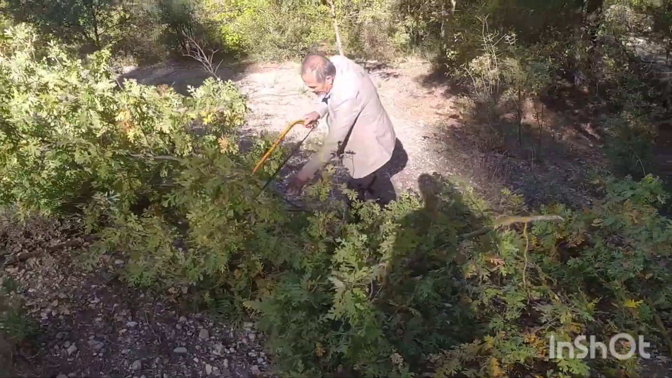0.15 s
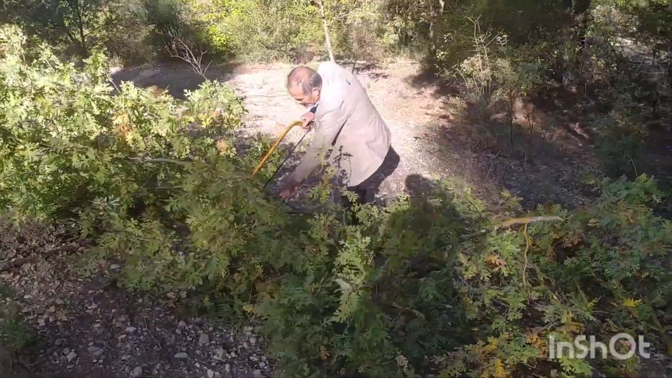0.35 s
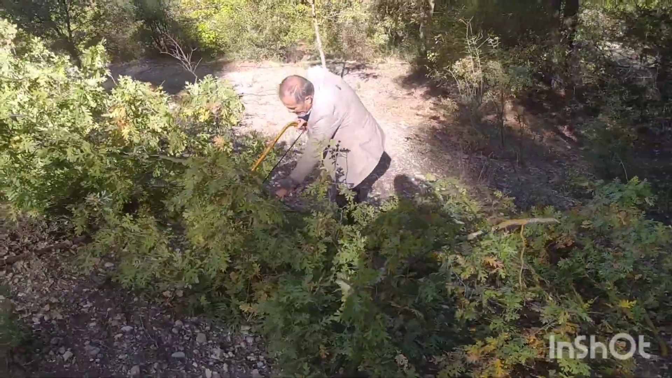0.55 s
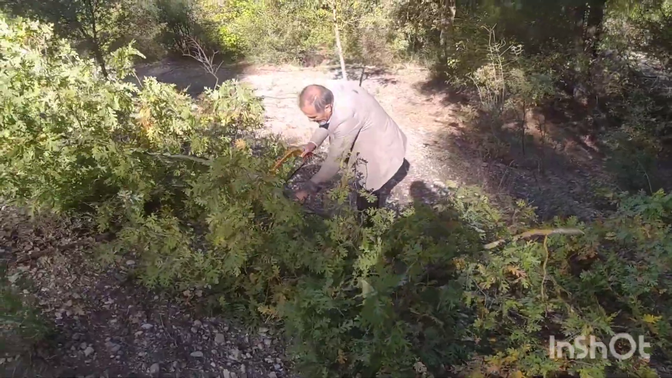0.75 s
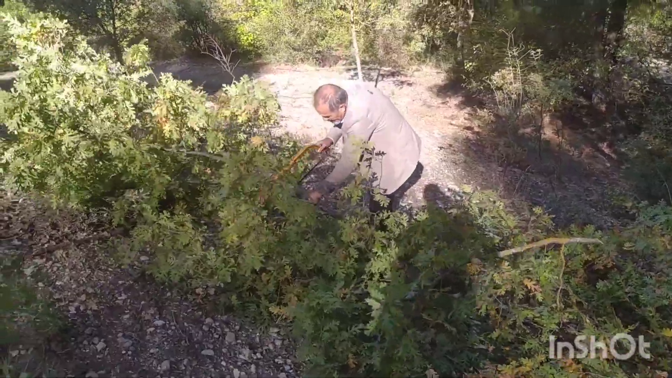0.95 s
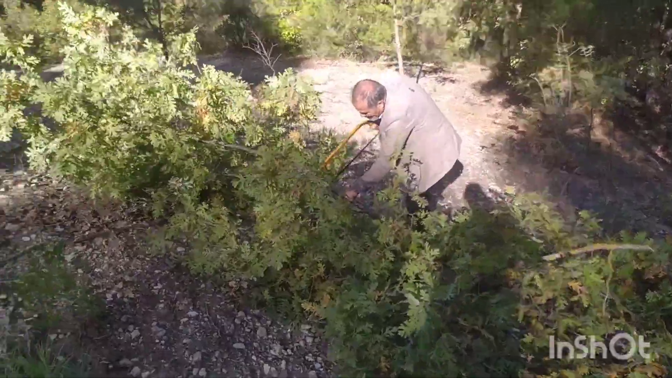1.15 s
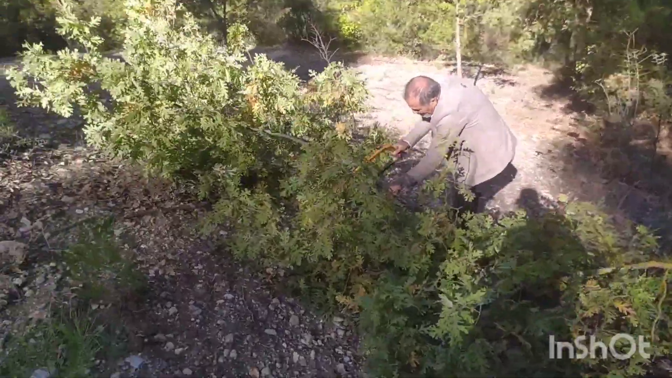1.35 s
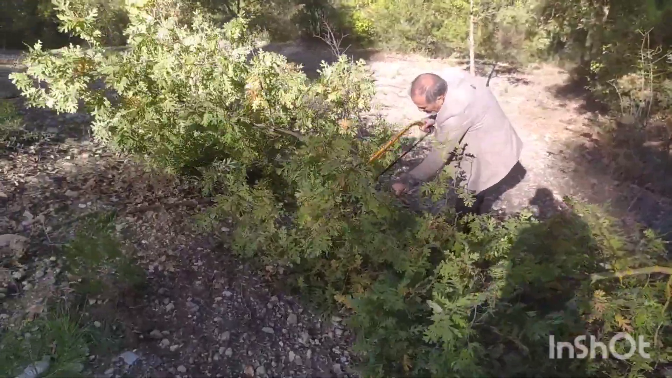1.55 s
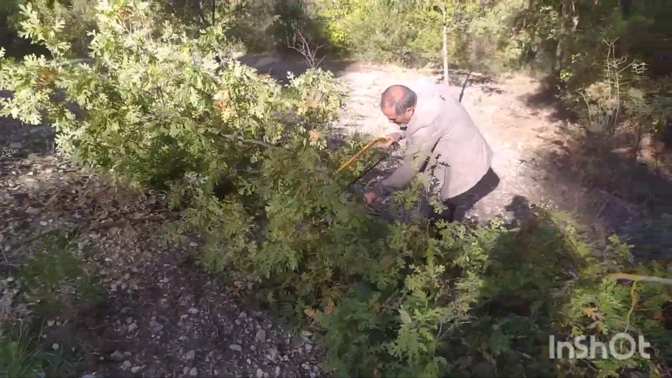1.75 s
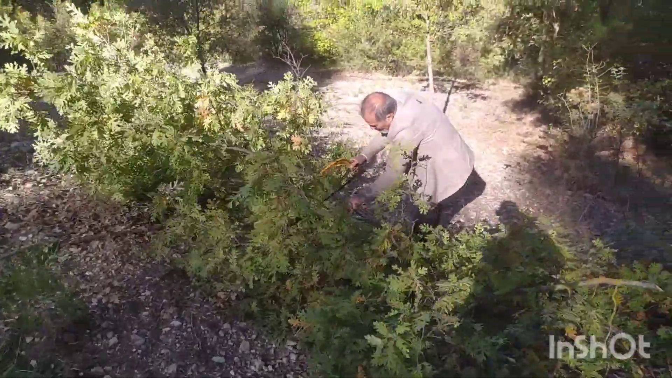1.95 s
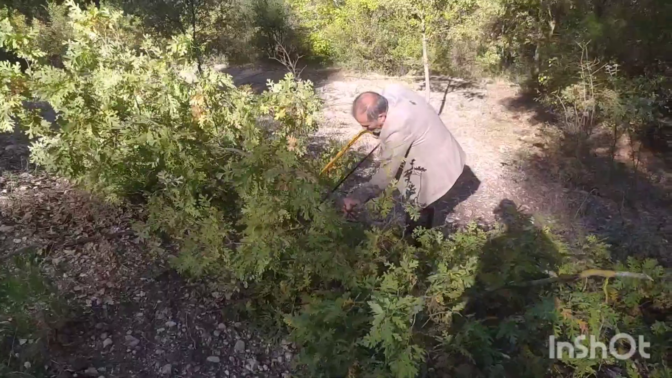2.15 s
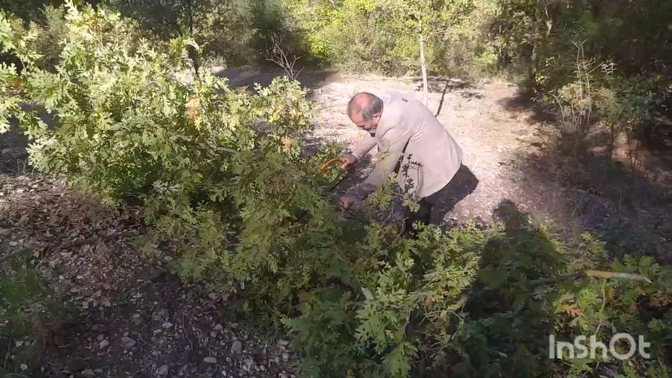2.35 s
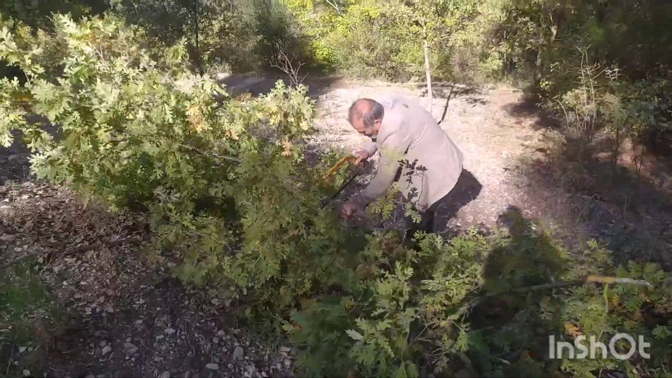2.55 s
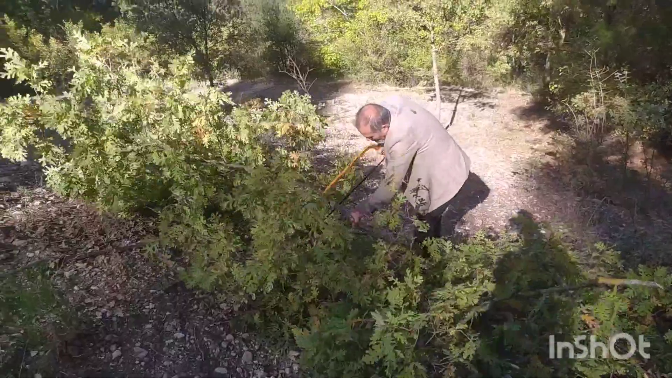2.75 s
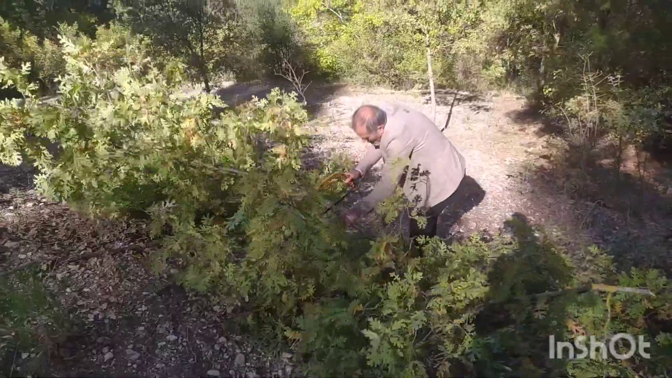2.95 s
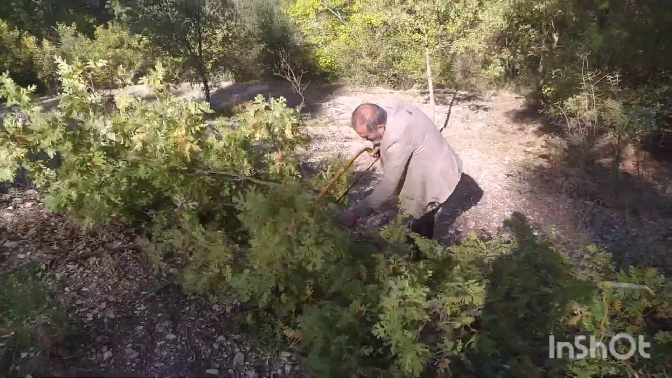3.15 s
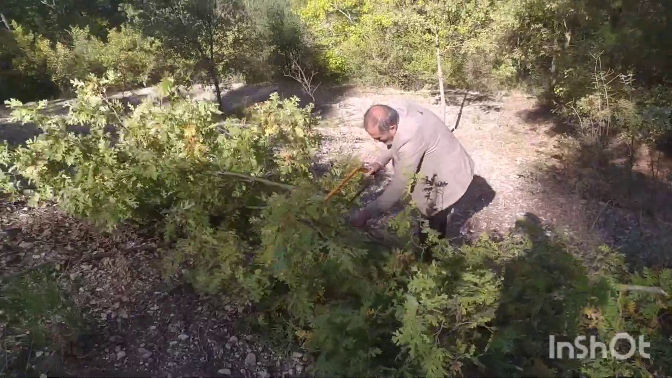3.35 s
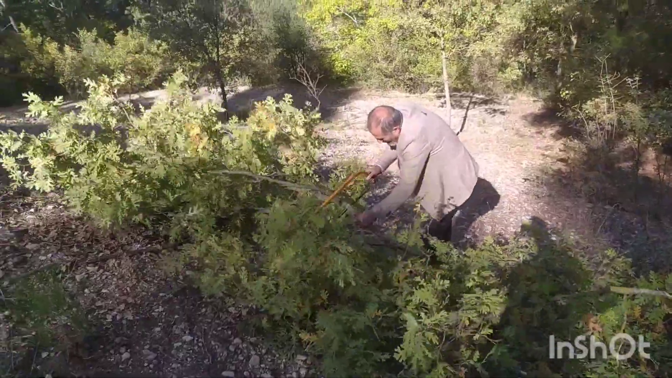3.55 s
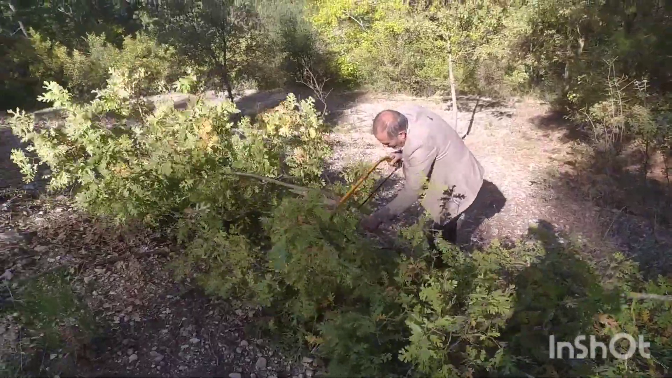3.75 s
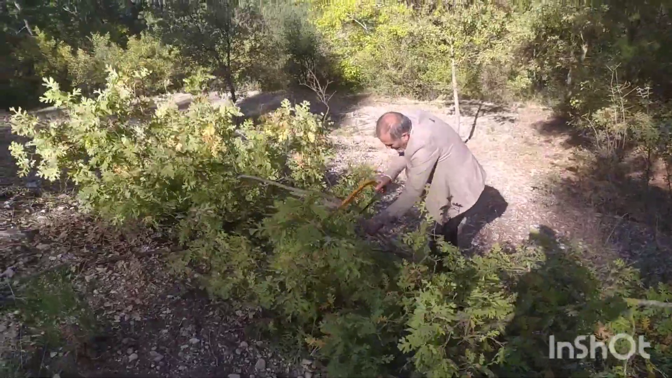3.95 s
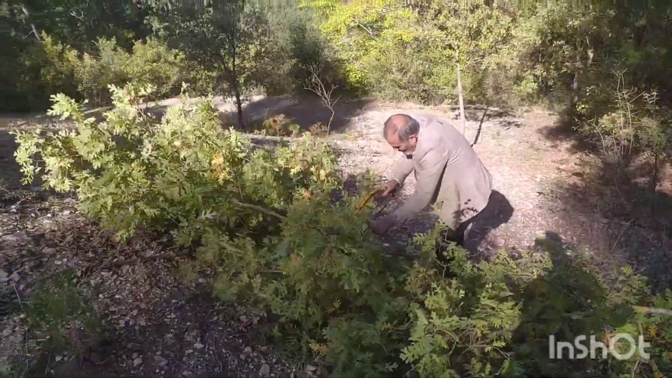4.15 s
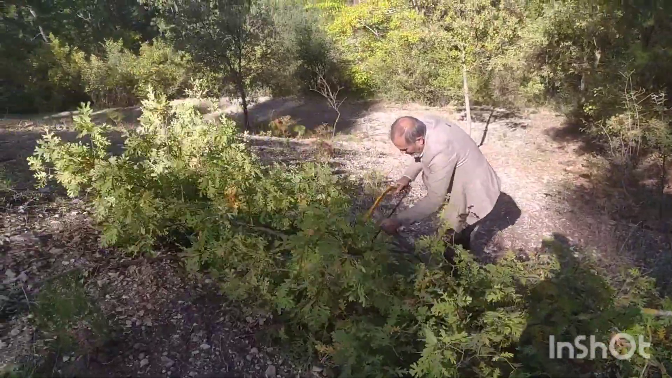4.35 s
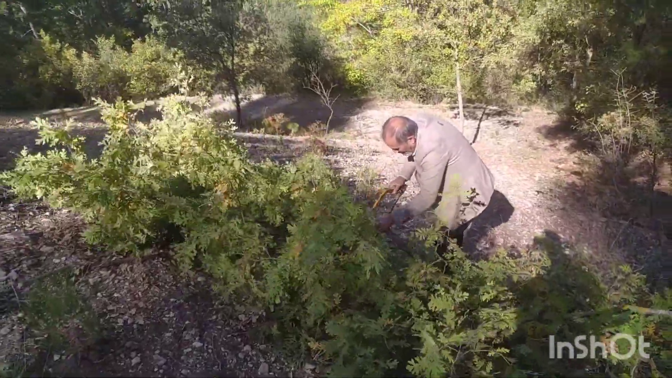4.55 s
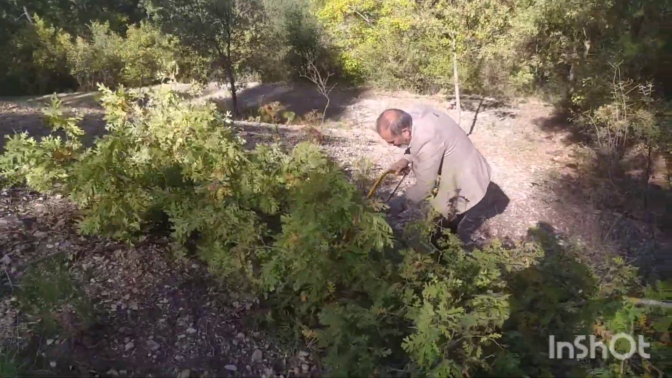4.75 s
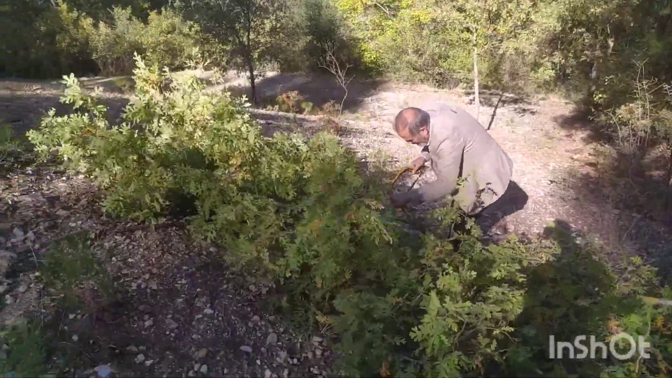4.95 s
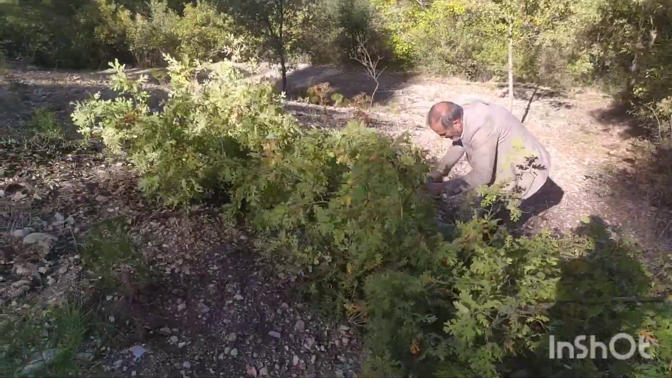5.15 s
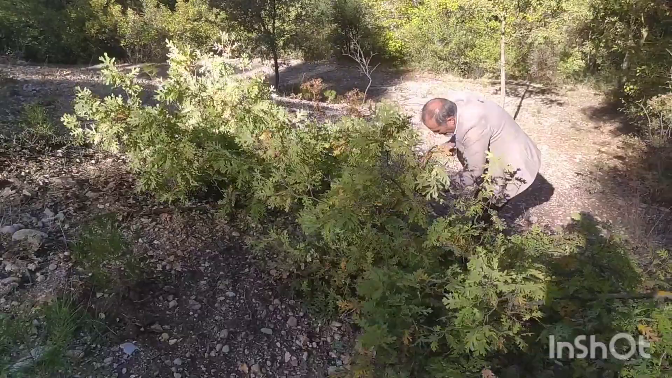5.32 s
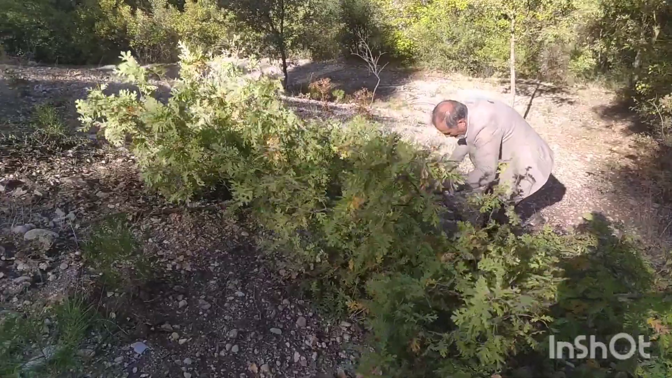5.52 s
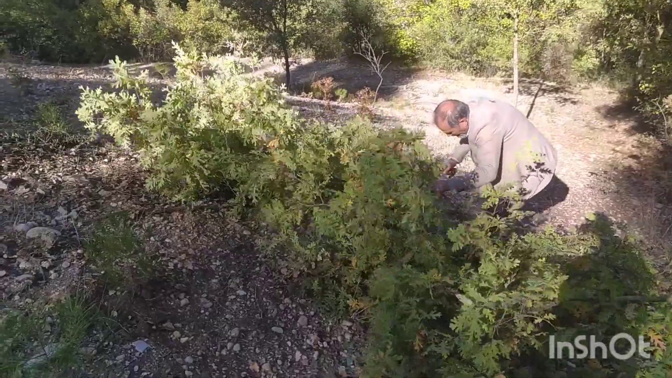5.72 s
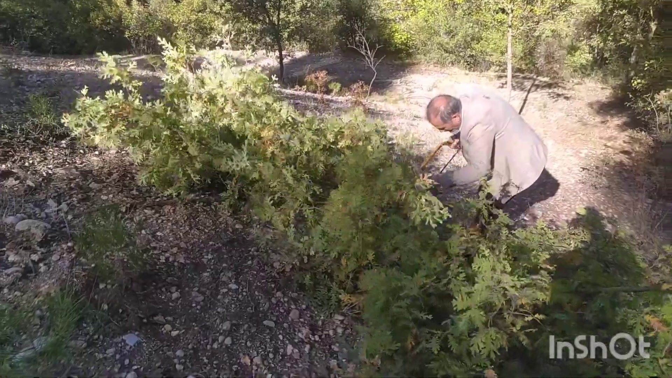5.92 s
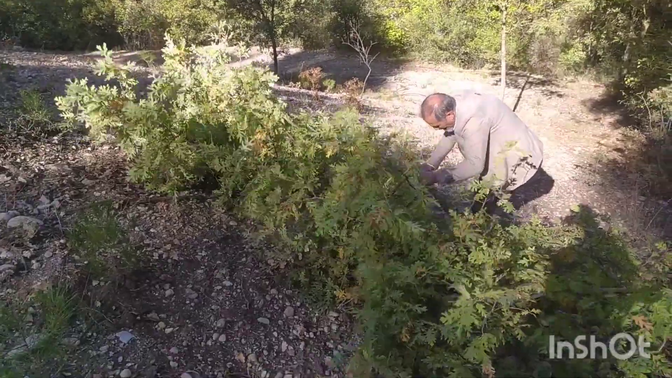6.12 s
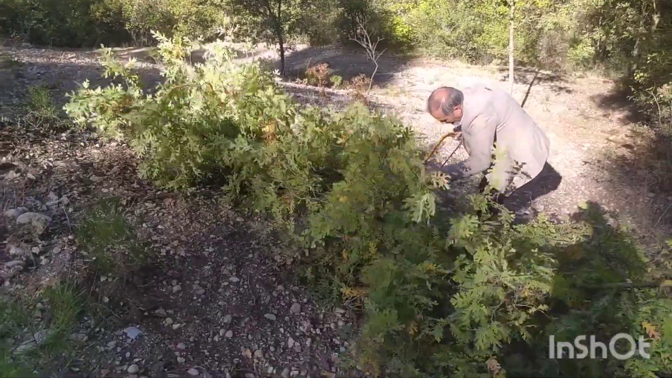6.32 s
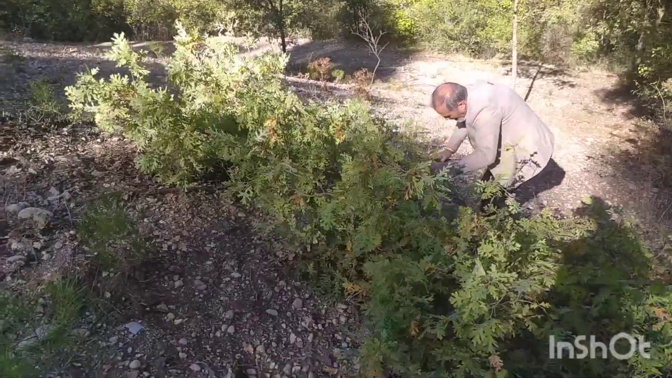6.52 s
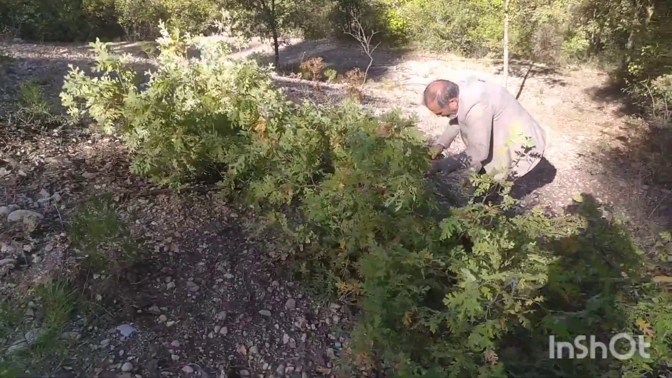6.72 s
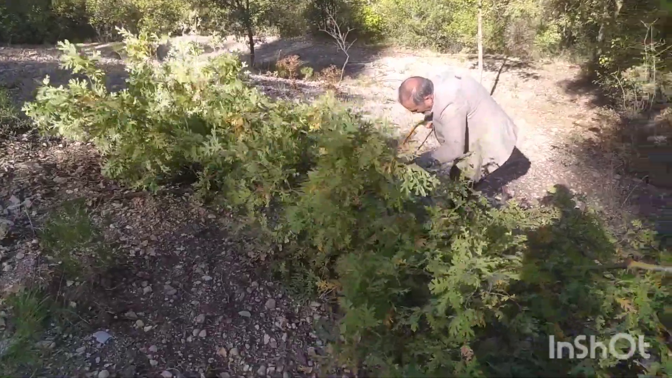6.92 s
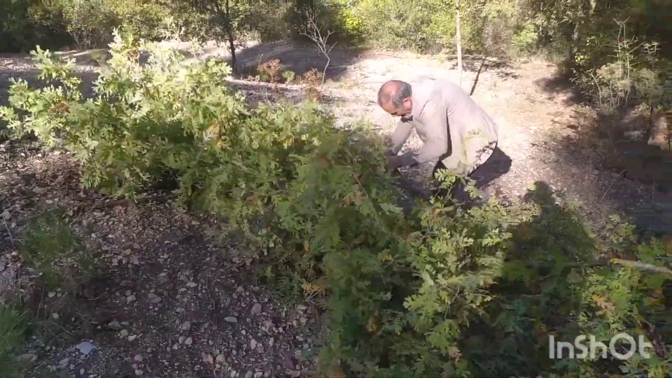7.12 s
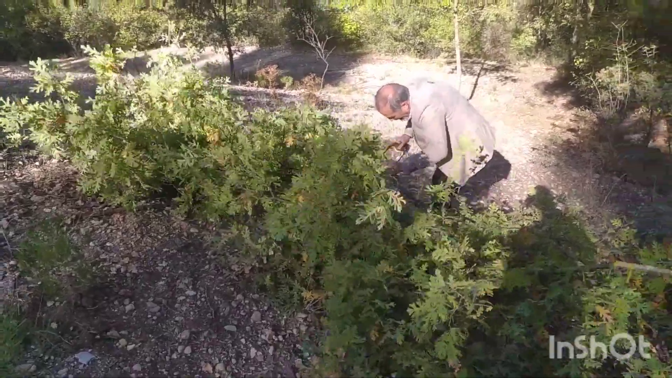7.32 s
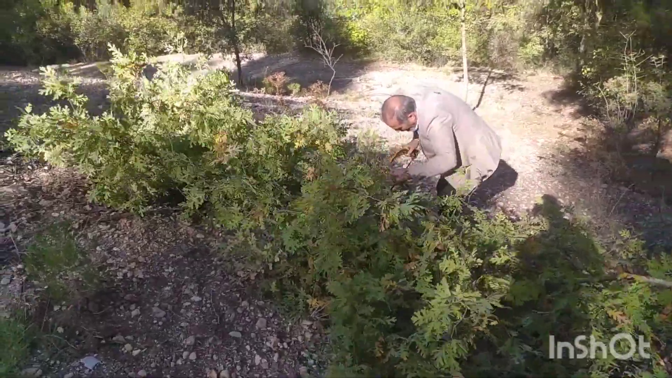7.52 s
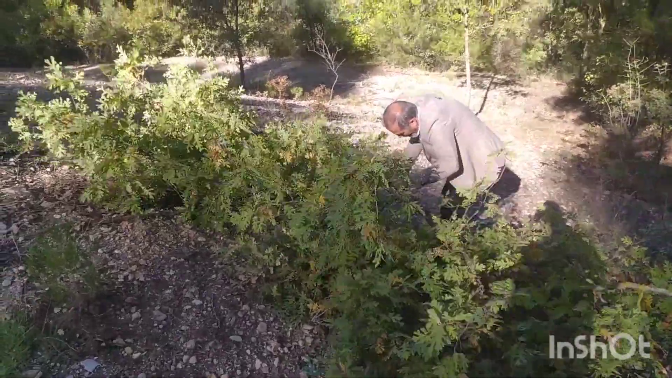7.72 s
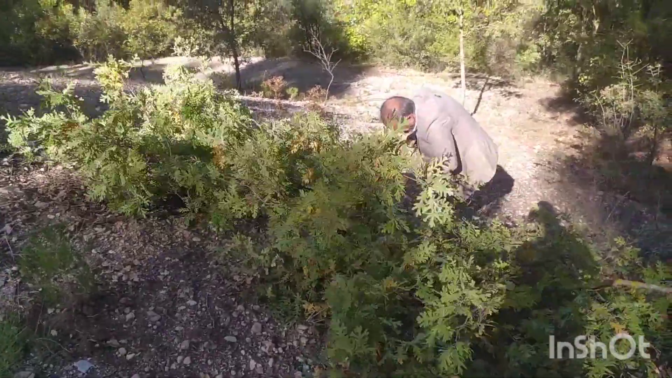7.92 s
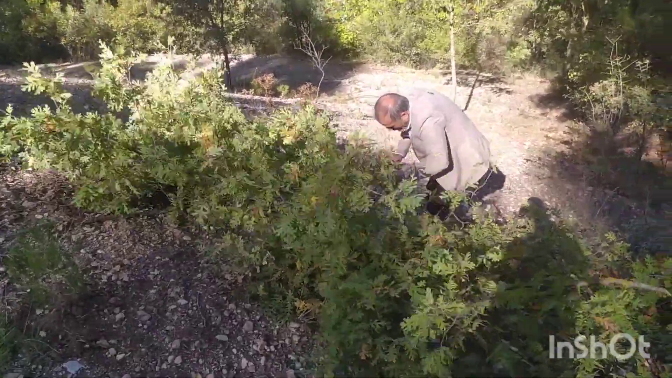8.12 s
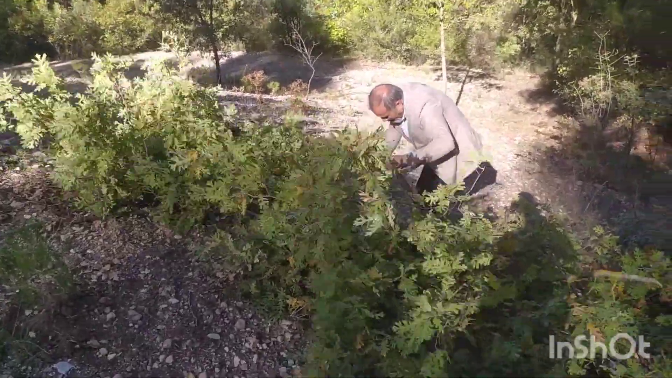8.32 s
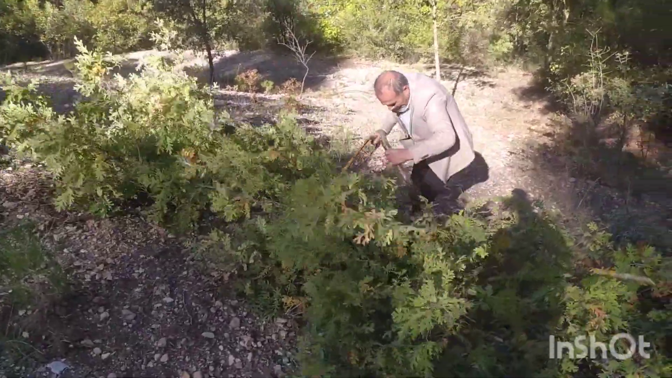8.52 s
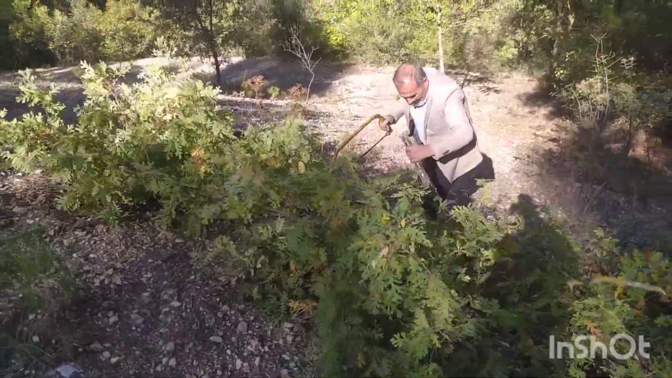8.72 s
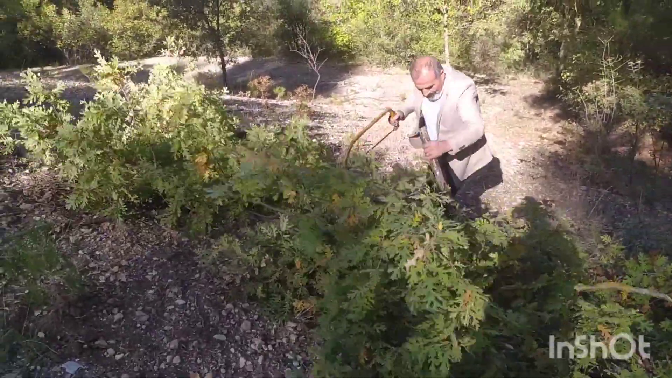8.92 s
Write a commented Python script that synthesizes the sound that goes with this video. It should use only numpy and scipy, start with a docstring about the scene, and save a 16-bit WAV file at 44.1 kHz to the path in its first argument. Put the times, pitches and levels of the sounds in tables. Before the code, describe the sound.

Outdoors at a woodland edge, dry leaves stir and small twigs tick before a bow saw starts rasping through a branch in quick, alternating hard and light strokes. It halts briefly midway as foliage rustles and twigs crack, then resumes with deeper, more ringing strokes. A loud snap and leaf rustle end the cut. A far engine and road hum sit faintly behind. Stereo microphone a few metres away, almost no echo.

```python
"""A bow saw rasps through a leafy branch in a wood, about four strokes a second, with a short rest half way.
The teeth tear wood, ring the blade, hiss as steel slides in the cut, and make the branch judder.
Shaken leaves rustle, twigs snap, and an engine labours far away over road noise and air.
Shaped noise makes the rasp, blade, leaves, snaps and background; the engine is a stack of sine overtones."""
import sys
import numpy as np
from scipy import signal
from scipy.fft import rfft, irfft, next_fast_len
from scipy.io import wavfile
from scipy.ndimage import uniform_filter1d, map_coordinates

SR = 44100
rng = np.random.default_rng(int(sys.argv[2]) if len(sys.argv) > 2 else 0)


def master_out(mix):
    """Clip the mix to full scale and print it as 16-bit PCM to the path in sys.argv[1]."""
    frames = np.transpose(np.atleast_2d(mix))
    ceiling = np.clip(frames, -1, 1)
    pcm = np.round(ceiling * 32767).astype(np.int16)
    wavfile.write(sys.argv[1], SR, pcm)


N = 400365

# Hard cutting strokes. Each row: start in seconds, length in seconds, rasp level in dB before the mix,
# change at the bite in dB.
CUTS = [(0.598, 0.32, -39.5, -0.1), (1.177, 0.27, -38.5, 7), (1.718, 0.26, -36.5, 7.2),
        (2.233, 0.26, -36.5, 5.5), (2.755, 0.26, -36.5, 8), (3.282, 0.24, -36, 0.5), (3.841, 0.23, -36, -2),
        (4.93, 0.291, -42, 6), (5.467, 0.24, -37.5, 2.5), (5.956, 0.263, -39, 9.5), (6.437, 0.29, -39, 11),
        (6.961, 0.28, -37, 10.5), (7.477, 0.28, -40.5, 9), (8.08, 0.15, -41, 5)]
# Lighter return strokes, the last a short scrape as the blade comes free.
# Each row: start in seconds, length in seconds, rasp level in dB before the mix.
RETURNS = [(0.922, 0.268, -39), (1.463, 0.25, -39), (1.984, 0.24, -36), (2.505, 0.24, -38.6),
           (2.993, 0.29, -40), (3.61, 0.23, -42.5), (4.674, 0.26, -52.5), (5.183, 0.301, -39),
           (5.698, 0.261, -38.5), (6.192, 0.265, -38.5), (6.712, 0.26, -37.7), (7.256, 0.23, -37),
           (7.711, 0.36, -44), (8.383, 0.072, -43.5)]
# Teeth tearing wood. Each row: frequency in Hz, relative density in dB per Hz.
RASP_SPECTRUM = [(250, -50), (420, -5.5), (650, -20.5), (820, -3.5), (1080, -9.5), (1350, -1), (2300, 2.5),
                 (2850, 1), (3150, -5), (3750, 2.5), (4500, -10.5), (5600, -6), (7500, -21)]
# Steel sliding in the cut. Each row: frequency in Hz, relative density in dB per Hz.
HISS_SPECTRUM = [(3500, -32), (5000, -9.5), (5800, -11.5), (6650, -1), (7200, -6.5), (8200, -0.5),
                 (9300, 0.5), (10300, -1.5), (11100, -10), (11800, -4.5), (12800, -14), (14900, -16),
                 (15800, -49)]
# Resonances of blade and frame. Each row: frequency in Hz, width in Hz, relative level in dB.
BLADE_MODES = [(816, 18, -11.5), (945, 30, -7), (1272, 36, -2.5), (1806, 66, -1.5), (2299, 67, 4),
               (2571, 25, 4), (2859, 26, 6), (3437, 38, 3.5), (3735, 37, 5.5), (4315, 14.4, 5.5),
               (5250, 17, -20), (6840, 39, -13)]
# Bending modes of the branch. Each row: frequency in Hz, width in Hz, relative level in dB.
BRANCH_MODES = [(273, 87, -3), (480, 98, -10.5), (864, 171, 1.5)]
# Foliage brushed or pulled, the short one at 0.03 s a step in the leaves. Each row: start in seconds, hold in
# seconds, motion level in dB before the mix.
RUSTLES = [(0.0, 0.09, -51), (0.03, 0.005, -41.3), (0.457, 0.07, -54), (4.077, 0.25, -39.5),
           (4.708, 0.012, -43), (4.8, 0.121, -58), (8.203, 0.085, -35.5), (8.394, 0.65, -49.5)]
# Dry leaves. Each row: frequency in Hz, relative density in dB per Hz.
LEAF_SPECTRUM = [(500, -29), (950, -17), (1800, -10.5), (3000, -13), (5200, -13), (7200, -4), (9100, 1.5),
                 (11000, -8), (14400, -18), (15800, -27)]
# A ticking stalk. Each row: frequency in Hz, relative density in dB per Hz.
STALK_SPECTRUM = [(300, -17), (800, -1.5), (1700, -3), (3000, 0), (4200, -23), (7000, -25)]
# Twig snaps, the first (0.173 s) a crunch underfoot. Each row: start in seconds, size in dB before the mix,
# woody knock in dB relative to that, # knock pitch in Hz.
SNAPS = [(0.173, -30.5, -14, 1820), (0.2194, -31.5, -25, 1740), (0.281, -28.5, -32, 1590),
         (0.327, -30, -33, 1640), (0.4121, -27, -15, 3740), (1.183, -23, -17, 2060),
         (4.088, -21, -38, 1940), (4.207, -13.5, -19, 2860), (4.2847, -18.5, -22, 2130),
         (4.3098, -10, -26, 1660), (4.7177, -23, -27, 2820), (5.034, -19, -29, 1630),
         (5.72, -16.5, -20, 1720), (6.4499, -16.5, -51, 1740), (7.2594, -16, -30, 1704),
         (8.2391, -4.5, -20, 3040), (8.974, -23, -32, 2330)]
# The sharp crack of a twig. Each row: frequency in Hz, relative density in dB per Hz.
CRACK_SPECTRUM = [(1000, -24), (2500, -17.5), (4200, -19.5), (5500, -10.5), (8000, 1.5), (9500, 2.5),
                  (11000, -8), (15000, -17), (15800, -30)]
# Far engine revving up. Each row: time in seconds, firing cycle in Hz, level in dB.
REVVING = [(0, 68.85, -59.5), (.7, 75.36, -56.5), (1.2, 79.7, -53.5), (1.44, 81.2, -54.5),
           (1.56, 82.1, -80)]
# Far engine pulling slowly. Each row: time in seconds, firing cycle in Hz, level in dB.
PULLING = [(3.2, 54, -70), (3.8, 48, -75), (4.8, 47.7, -71), (5.2, 49.2, -69), (7.4, 51.1, -62.5),
           (8.3, 51.6, -61.5), (9.08, 55, -56)]
# Engine overtones. Each row: multiple of the cycle, dB when revving, dB when pulling,
# dB change at full throttle.
OVERTONES = [(2, -15, -9.5, 4.5), (3, -1, -3, 6), (4, -9.5, -1, -1), (5, -13, -1.5, -2), (6, -17.5, -4, 11),
             (7, -45, -3.5, -0.5), (8, -18.5, -12, -15)]
# Throttle of the pulling engine. Each row: time in seconds, opening from 0 to 1.
THROTTLE = [(8.35, 0.08), (8.65, 0.94)]
# Slow swell of the road noise. Each row: time in seconds, level in dB before the mix.
DRONE = [(0, -56.5), (1.3, -55), (1.8, -59), (4.6, -62), (6.3, -57), (9.08, -54.5)]
# Far road noise. Each row: frequency in Hz, relative density in dB per Hz.
ROAD_SPECTRUM = [(70, 0.5), (130, -7.5), (220, 2.5), (330, -0.5), (450, 0), (650, -7.5), (1200, -9),
                 (3000, -21.5)]
# Open air. Each row: frequency in Hz, relative density in dB per Hz.
AIR_SPECTRUM = [(20, 12.5), (45, 5), (100, -7), (200, 1.5), (500, -22), (1000, -7.5), (1700, -10),
                (3200, -19), (6000, -33), (12000, -56)]
# Stereo width of the noise. Each row: frequency in Hz, likeness of left and right from -1 to 1.
ALIKE = [(100, 0.52), (400, 0.74), (1400, 0.63), (2600, 0.65), (3900, 0.39), (4700, 0.076), (6500, 0.041),
         (15000, -0.017)]
# Lean of the whole mix. Each row: frequency in Hz, left minus right in dB.
BALANCE = [(60, -2.5), (200, -2.5), (780, -3), (1300, 3), (2300, 3), (3700, -1.5), (4800, -7), (6400, 2),
           (8300, -0.5), (9300, -8), (10100, 1), (12000, 3), (15000, 2.5)]

# where in a cut the arm leans hardest (share of its length); build-up and let-go
BITE_SHARE, LEAN_S, RELEASE_S = 0.668, 0.067, 0.033
CUT_STEEP, RETURN_STEEP = 1.33, 1.24  # rasp amplitude grows as this power of blade speed
SKATE_S, SKATE_DB, CATCH_S = 0.038, -4, 0.0017  # after each turn the teeth slide lightly, then catch
HISS_DB = 5.5  # gain of the steel hiss
# judder drive relative to the rasp; dB more per dB of bite; rise as the cut deepens
JUDDER_DB, JUDDER_PER_BITE, LOOSEN_DB_PER_S = -26, 0.89, 1.0
RING_DB_PER_S = 0.65  # the blade rings more as the cut deepens and grips it
GRIP_DB, GRIP_PER_S = 1.18, 45  # the wood tears in uneven clumps: their depth and rate
RUSTLE_ATTACK_S, RUSTLE_DECAY_S = 0.006, 0.062
# leaf motion relative to the saw's rasp strength; settling time; motion of leaves at rest
SWAY_DB, SETTLE_S, STILL_DB = -7, 0.87, -59
TOP_HZ = 15500  # upper band limit


def stroke(start, length, db, bite_db, steep):
    """One sweep of the blade: its speed (0-1) and the strengths of rasp and judder."""
    t = np.arange(N) / SR - start
    speed = np.abs(np.sin(np.pi * np.clip(t / length, 0, 1)))
    past_bite = t - BITE_SHARE * length
    press = np.exp(-(past_bite / np.where(past_bite < 0, LEAN_S, RELEASE_S)) ** 2)
    skating = (1 - np.tanh((t - SKATE_S) / (2 * CATCH_S))) / 2
    rasp = amp(db + bite_db * press + SKATE_DB * skating) * speed ** steep
    judder_db = JUDDER_DB + JUDDER_PER_BITE * bite_db + LOOSEN_DB_PER_S * start
    judder = rasp * amp(judder_db) * (1 + 1.06 * press)
    return np.array([speed, rasp, judder])


def arm():
    """Hard cuts alternate with light returns: blade speed and the strengths of rasp and judder."""
    cuts = sum(stroke(*row, CUT_STEEP) for row in CUTS)
    returns = sum(stroke(*row, 0, RETURN_STEEP) for row in RETURNS)
    return cuts + returns


def shifting(x, depth_db, size=1024):
    """Narrow bands of the sound swell and fade at random."""
    z = signal.stft(x, nperseg=size)[2]
    field = rng.standard_normal(z.shape[1:])
    field = uniform_filter1d(field, size=3, axis=0)  # smooth over frequency
    field = uniform_filter1d(field, size=8, axis=1)  # smooth over time
    gain = unit(amp(depth_db * unit(field)))
    return signal.istft(z * gain, nperseg=size)[1][:, :N]


def saw(speed, rasp, judder, tooth_hz=330, jitter=0.0401, rasp_db=-1, blade_db=-8.0, judder_db=-19, thud_db=-11):
    """Each tooth tears a burst of fibres; the train of teeth also pushes the branch."""
    tooth_rate = tooth_hz * speed * (1 + jitter * wobble(150))
    phase = 2 * np.pi * np.cumsum(tooth_rate) / SR
    # every tooth meets other fibres, and the grip changes along the stroke
    unevenness_db = 0.64 * wobble(600) + 1.39 * wobble(110) + 0.77 * wobble(30)
    tearing = rasp * unit(amp(1.2 * np.cos(phase) + unevenness_db))
    wood = amp(rasp_db) * coloured(tearing * noise(), RASP_SPECTRUM)
    ring_db = blade_db + RING_DB_PER_S * np.arange(N) / SR
    blade = amp(ring_db) * resonate(tearing * noise(), BLADE_MODES)
    steel = amp(HISS_DB) * coloured(tearing * noise(), HISS_SPECTRUM)
    # the branch grunts when the tooth rate passes through its bending mode
    push = (np.cos(phase) + np.cos(2 * phase) / 2) * amp(3.5 * wobble(90))
    branch = resonate(judder * (amp(judder_db) * push + amp(thud_db) * noise()), BRANCH_MODES)
    grip = amp(GRIP_DB * wobble(GRIP_PER_S))
    return grip * shifting(wood + blade, depth_db=3.0) + shifting(steel, depth_db=5.0) + branch


def shaking(rasp):
    """How hard the leaves move: they follow the saw sluggishly, and flare up when brushed, pulled or stepped
    on."""
    t = np.arange(N) / SR
    keep = np.exp(-1 / (SETTLE_S * SR))
    sway = amp(SWAY_DB) * signal.lfilter([1 - keep], [1, -keep], rasp)
    power = sway ** 2 + amp(STILL_DB) ** 2
    for start, hold, db in RUSTLES:
        rise = np.clip((t - start) / RUSTLE_ATTACK_S, 0, 1)
        fall = np.exp(-np.maximum(t - start - hold, 0) / RUSTLE_DECAY_S)
        power += (amp(db) * rise * fall) ** 2
    return np.sqrt(power)


def foliage(motion, level_db=-1, crackle_db=1.5, flutter_db=-0.2, tick_rate=10, tick_db=5, tick_s=0.0016):
    """Dry leaves brush each other in dense tiny crackles; at random, about ten times a second, a stalk ticks."""
    crackle = unit(amp(crackle_db * wobble(900) + flutter_db * wobble(20)))
    flicks = (rng.random(N) < tick_rate / SR) * amp(tick_db + rng.uniform(-4, 3.1, N))
    ticks = signal.lfilter([1], [1, -np.exp(-1 / (tick_s * SR))], flicks)
    shake = motion * amp(level_db)
    leaves = coloured(shake * (crackle + ticks) * noise(), LEAF_SPECTRUM)
    stalks = coloured(shake * ticks * noise(), STALK_SPECTRUM) / 2
    return leaves + stalks


def twigs(crack_db=-7, knock_db=3, knock_width=0.13, t60=0.027, attack_share=0.015, size_db=-14,
          tail_db=-20, tail_t60=0.2):
    """A twig breaks in a sharp crack and a woody knock, longer when it is thick, and shakes its neighbours."""
    sharp, knocks = np.zeros((2, 2, N + SR))
    t = np.arange(SR // 5) / SR
    fibres = noise()
    for s, db, wood_db, hz in SNAPS:
        length = t60 * amp(0.57 * (db - size_db))  # t60 is the decay of a twig of size_db
        attack = 1 - np.exp(-t / (attack_share * length))
        neighbours = amp(tail_db - 60 * t / tail_t60)
        burst = amp(db) * (amp(-60 * t / length) + neighbours) * attack
        start = round(s * SR)
        at = slice(start, start + len(t))
        sharp[:, at] += burst * amp(crack_db)
        grain = np.roll(fibres, -start, axis=1)[:, :len(t)]
        ring = signal.lfilter(*signal.iirpeak(hz, 1 / knock_width, SR), grain)
        knocks[:, at] += burst * amp(wood_db + knock_db) * unit(ring)
    return coloured(sharp[:, :N] * noise(), CRACK_SPECTRUM) + knocks[:, :N]


def trees(x, t60=0.063, wet_db=-17):
    """Trunks and ground scatter a short, weak echo, modelled as decaying noise."""
    t = np.arange(SR // 3) / SR
    tail = rng.standard_normal((2, len(t))) * amp(-60 * t / t60) * (1 - np.exp(-t / 0.0052))
    tail = tail / np.linalg.norm(tail[0])
    return x + amp(wet_db) * signal.fftconvolve(x, tail, axes=1)[:, :N]


def engine_run(rows, overtones, waver_db=0.74, fade_s=0.08):
    """Overtones of the firing cycle, each wavering on its long way through the trees."""
    t = np.arange(N) / SR
    hz, db = curves(rows)
    heard = np.clip(1 + np.minimum(t - rows[0][0], rows[-1][0] - t) / fade_s, 0, 1)
    phase = 2 * np.pi * np.cumsum(hz) / SR
    tones = 0
    for k, level in overtones:
        waver = amp(level + waver_db * wobble(7))
        tones = tones + waver * np.sin(k * phase + rng.uniform(0, 2 * np.pi))
    return np.sqrt(2) * heard * amp(db) * tones


def engine(revving_db=0, pulling_db=0):
    """A far engine revs up, drops away, and returns at lower speed until the throttle opens again."""
    throttle, = curves(THROTTLE)
    revving = engine_run(REVVING, [(round(k), db) for k, db, _, _ in OVERTONES])
    pulling = engine_run(PULLING, [(round(k), db + open_db * throttle) for k, _, db, open_db in OVERTONES])
    return amp(revving_db) * revving + amp(pulling_db) * pulling


def background(road_db=-2, air_db=-62):
    """Far road noise over the faint rush of the open air, both gently unsteady noise."""
    drone_db, = curves(DRONE)
    road = amp(drone_db + road_db + wobble(5.3)) * coloured(noise(), ROAD_SPECTRUM)
    air = amp(air_db + wobble(2.8)) * coloured(noise(), AIR_SPECTRUM)
    return road + air


def amp(db):
    """Decibels to gain."""
    return 10 ** (np.asarray(db) / 20)


def unit(x):
    """Scale to rms 1."""
    return x / np.sqrt(np.mean(x ** 2) + 1e-20)


def along(points, hz):
    """Read (Hz, value) points on a log frequency axis."""
    f, v = np.transpose(points)
    return np.interp(np.log(hz + 1), np.log(f + 1), v)


def curves(rows):
    """One value per sample for each column after the time."""
    s, *cols = np.transpose(rows)
    return [np.interp(np.arange(N) / SR, s, c) for c in cols]


def wobble(rate):
    """A smooth random curve, rate knots a second."""
    knots = rng.standard_normal(int(N * rate / SR) + 4)
    return map_coordinates(knots, [np.arange(N) * rate / SR])


def filtered(x, response):
    """Multiply the spectrum of x by a response of frequency."""
    m = next_fast_len(N + SR // 2)
    return irfft(rfft(x, m) * response(np.fft.rfftfreq(m, 1 / SR)), m)[..., :N]


def coloured(x, spectrum):
    """x through a smooth (Hz, dB) spectrum, with a power gain of 1 for white noise."""
    return filtered(x, lambda hz: unit(amp(along(spectrum, hz))))


def resonate(x, modes):
    """x through (Hz, width, dB) resonances, with a power gain of 1 for white noise."""
    def response(f):
        h = sum(amp(db) * 1j * f * w / (c * c - f * f + 1j * f * w) for c, w, db in modes)
        return h / np.sqrt(np.mean(np.abs(h) ** 2))
    return filtered(x, response)


def noise():
    """White stereo noise whose left-right likeness follows ALIKE, least in the treble."""
    def mid_side(hz):
        turn = np.arccos(np.clip(along(ALIKE, hz), -1, 1)) / 2
        return np.array([np.cos(turn), np.sin(turn)])
    mid, side = filtered(rng.standard_normal((2, N)), mid_side)
    return np.array([mid + side, mid - side])


def scene():
    """The work at the branch and the far sounds, leaning a little to one side or the other by band."""
    speed, rasp, judder = arm()
    near = saw(speed, rasp, judder) + foliage(shaking(rasp)) + twigs()
    mix = trees(near) + engine() + background()
    return filtered(mix, lambda hz: amp(np.array([[0.5], [-0.5]]) * along(BALANCE, hz)))


def record(dry):
    """A very steep low-pass cuts the treble off above the band limit."""
    return filtered(dry, lambda hz: 1 / (1 + (hz / TOP_HZ) ** 120))


dry = scene()
out = record(dry)
master_out(out)
```